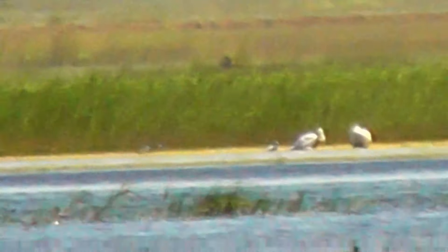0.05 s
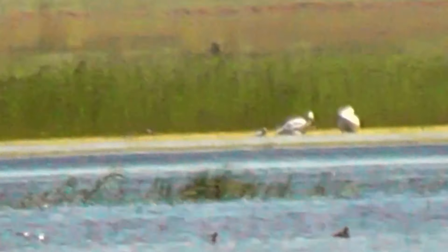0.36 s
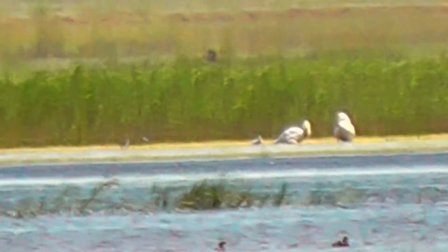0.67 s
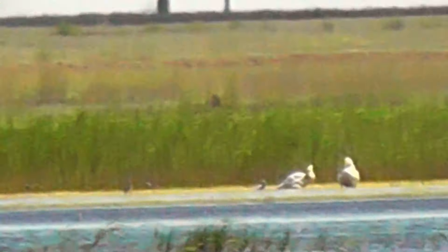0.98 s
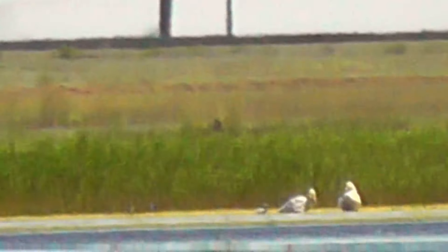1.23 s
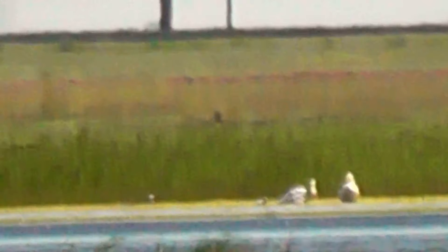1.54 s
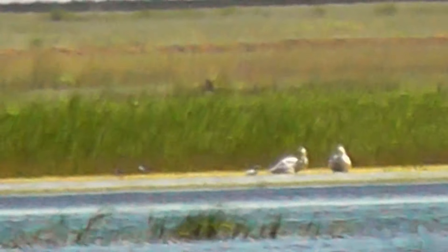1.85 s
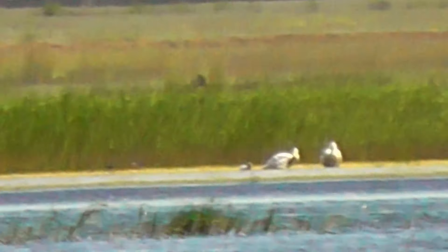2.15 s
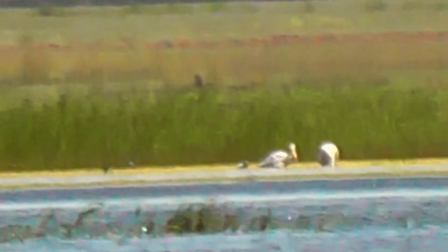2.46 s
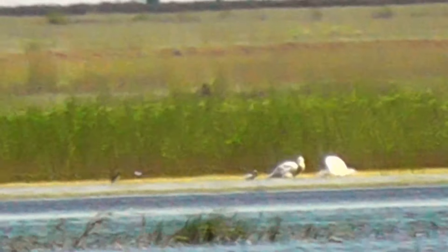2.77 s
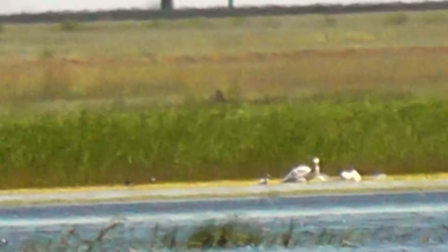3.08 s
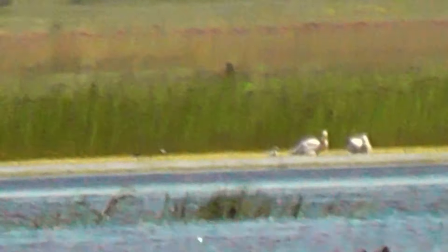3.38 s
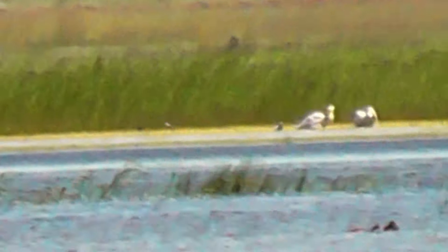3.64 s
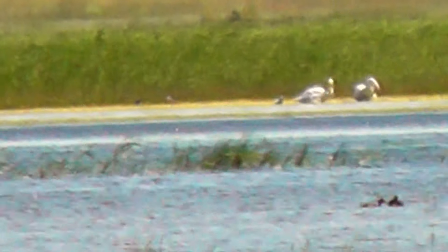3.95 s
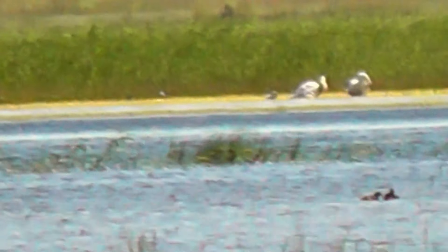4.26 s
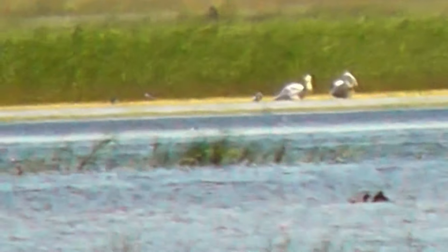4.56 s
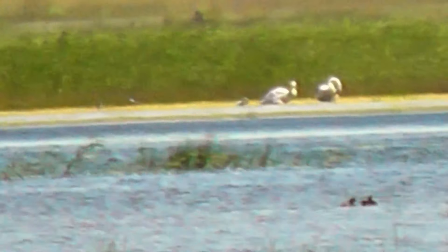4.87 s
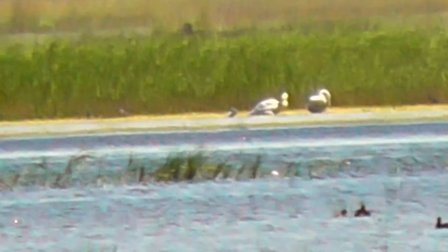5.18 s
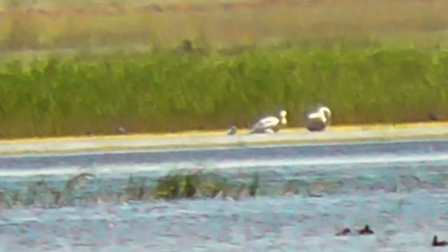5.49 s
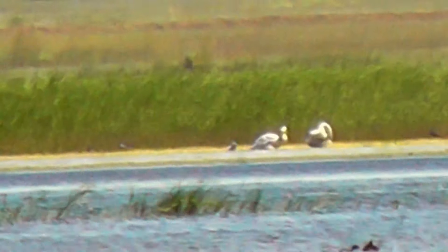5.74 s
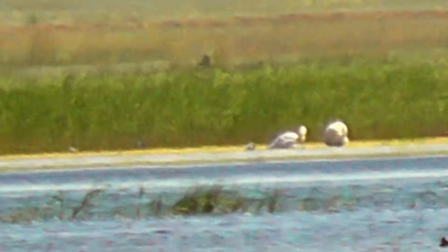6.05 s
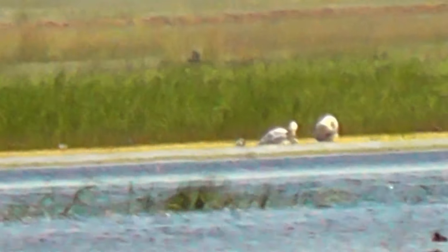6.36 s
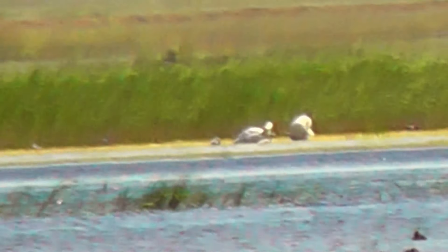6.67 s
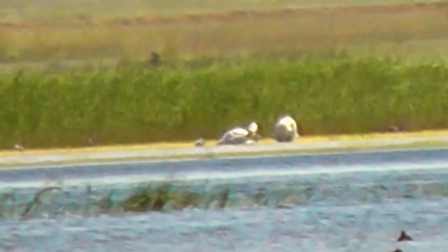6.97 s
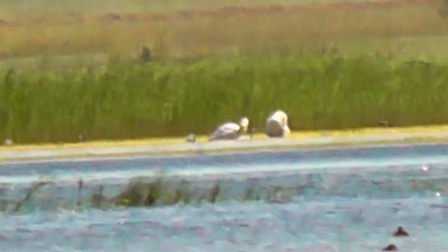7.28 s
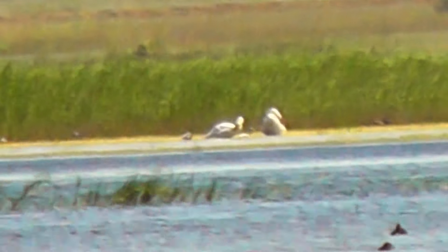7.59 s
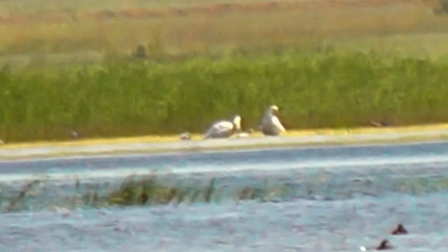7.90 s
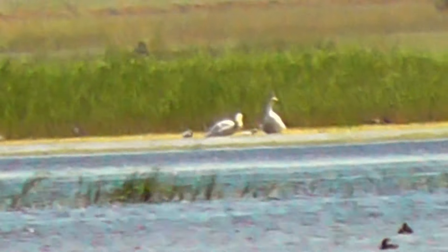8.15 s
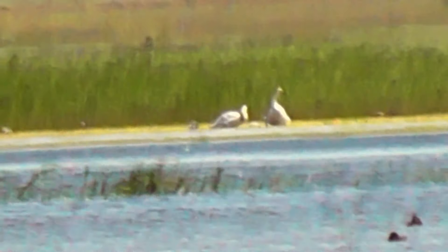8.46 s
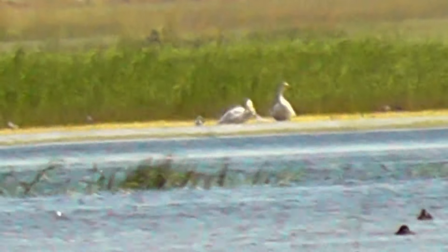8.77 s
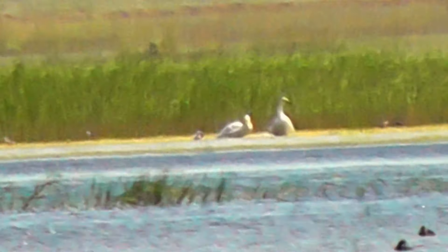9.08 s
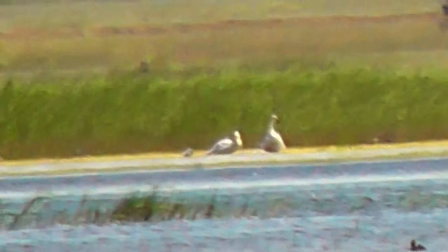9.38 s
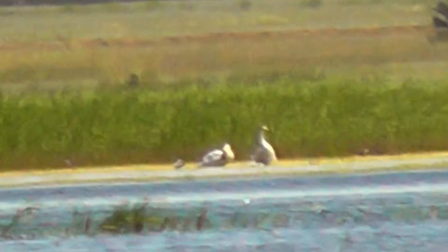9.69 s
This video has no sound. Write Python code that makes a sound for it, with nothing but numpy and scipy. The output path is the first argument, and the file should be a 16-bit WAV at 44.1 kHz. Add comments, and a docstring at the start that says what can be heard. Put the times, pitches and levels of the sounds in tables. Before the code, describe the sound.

Short nasal waterbird calls repeat steadily, then turn quieter, while wind buffets the microphone and water and reeds hiss faintly.

```python
"""A waterbird repeats short, rising, nasal calls on a lake shore. Its voice box makes the tone, and its
throat and bill shape it. Each call has one close reflection and a faint trail from the open land.
One call breaks off abruptly, and the later ones are softer. Wind rumbles on the microphone, a hand
brushes and knocks the camera, far birds whistle, and water and reeds hiss."""
import sys
import numpy as np
from scipy import signal
from scipy.fft import rfft, irfft, next_fast_len
from scipy.io import wavfile

SR = 44100
rng = np.random.default_rng(int(sys.argv[2]) if len(sys.argv) > 2 else 0)


def generate_wav(signal):
    """Clip the signal to [-1, 1] and save it as 16-bit WAV at the path in sys.argv[1]."""
    frames = np.transpose(np.atleast_2d(signal))
    scaled = np.clip(frames, -1, 1) * 32767
    pcm = np.round(scaled).astype(np.int16)
    wavfile.write(sys.argv[1], SR, pcm)


N = 433503
TIME = np.arange(N) / SR
SIDES = np.array([[.5], [-.5]])  # left, right
# Where the bird sits between the ears. Each row: time in seconds, left minus right in dB.
BIRD_LEAN = [(0, -4.5), (1.4, -4), (2.3, -3.5), (3.6, -1.2), (6.02, -1.2), (6.22, -6.5), (7.9, -4),
             (9.7, -5.5)]


def waterbird(break_s=6.0368, resume_s=6.2, trail_db=-2, catch_lead_s=0.0049, catch_db=9):
    """Two runs of calls; the first stops dead in the middle of a call, trail and all."""
    # Each row: start in seconds, length in seconds, halfway pitch in Hz, relative level in dB, boost of
    # the third harmonic in dB, swell in dB, roughness from 0 to 1, reflection delay in milliseconds.
    calls = [(0.061, .06, 1009, -36, -0.5, -0.5, 0.58, 2.24),
             (.37, 0.056, 1045, -33, -0.5, 7.5, 0.64, 2.57),
             (0.794, 0.056, 1061, -30.5, 1, 7.5, 0.46, 5.55),
             (1.205, 0.059, 1046, -30, 1.5, 0.5, 0.65, 3.66), (1.649, 0.062, 1049, -31, 1.5, 4, 0.64, 2.6),
             (2.038, .057, 1005, -29, 3, 1.5, 0.42, 4.26), (2.319, 0.067, 954.6, -30.5, 1.7, -1, 0.45, 3.8),
             (2.947, .055, 955, -32, 3.5, 3.5, 0.5, 4.5), (3.244, 0.069, 955, -33, -0.5, 4, 0.6, 8.7),
             (3.547, 0.068, 938.4, -33, -1, 5, 0.34, 8.63), (3.83, 0.069, 932, -33, 2.5, 3.5, 0.59, 3.85),
             (4.193, 0.057, 965.3, -30, -1.3, 0, .43, 4), (4.576, 0.064, 972, -32.5, 1.5, 4.5, 0.55, 6.6),
             (4.879, 0.066, 991.6, -31, -1.5, 1, 0.58, 6.2),
             (5.225, 0.061, 987.3, -30, -2.5, 3, 0.68, 6.67),
             (5.581, 0.065, 972, -29.5, -1.5, -4, 0.57, 4.1),
             (6.013, 0.036, 965.3, -31.5, -0.5, 8, 0.54, 2.7), (6.227, 0.063, 921, -41, 0, 6, 0.56, 13.63),
             (6.653, .063, 944, -44.5, 2.5, 5, 0.37, 5.31), (6.97, 0.059, 911, -41, 2.7, 5, 0.24, 3.4),
             (7.251, 0.059, 919, -41.5, -0.8, 7.5, .33, 4.7), (7.517, 0.06, 916, -39, 5, 0.5, 0.17, 1.35),
             (7.791, 0.064, 911, -43.5, -0.8, -2.5, 0.46, 3.1),
             (8.149, 0.056, 931, -45, 8.5, 4.5, 0.26, 2.01), (8.556, 0.051, 950, -43, 1.5, 7, 0.37, 4.26),
             (8.894, 0.059, 922, -42.5, 0.5, 7.5, 0.2, 3.4), (9.214, .058, 938, -42.5, 3, 5, 0.25, 1.86),
             (9.604, .057, 941, -45.5, 3.5, 12, 0.35, 4.4)]
    first, second = np.zeros((2, 2, N))
    for row in calls:
        start_s = row[0]
        run = first if start_s < resume_s else second
        add(run, start_s - catch_lead_s, gain_of(catch_db) * catch(row))
        add(run, start_s, call(row))
    first += gain_of(trail_db) * swaying(shore(first))
    second += gain_of(trail_db) * swaying(shore(second))
    return first * (TIME < break_s) + second


def call(row, scoop=0.1002, scoop_s=.004, bend=0.13, attack_s=0.017, release_s=0.012,
         jitter=0.049, shimmer=0.6, rasp_db=-23, full_force_db=-27):
    """The voice box locks on a rising pitch, then frays; its delayed reflection beats against it."""
    # Resonances of the throat and bill. Each row: frequency in Hz, gain in dB.
    throat = [(900, -19), (1080, -18), (1820, -3.5), (1960, -3.3), (2120, 1), (2750, 0.5), (3200, -0.06),
              (3700, -6), (3950, -7), (4200, -10), (4600, -14), (4850, -14), (5200, -19)]
    # Harmonics above the fifth. Each row: frequency in Hz, dB relative to the fifth at full force.
    overtones = [(5600, -15), (6200, -22), (6900, -15.5), (7600, -16.5), (8600, -21), (9600, -26),
                 (11500, -33), (15000, -40)]
    # Extra lean between the ears. Each row: frequency in Hz, left minus right in dB.
    extra_lean = [(1000, -4.2), (2000, -1.2), (3000, 0), (4000, -.8), (5000, -3.2), (6000, 3), (9000, 3)]
    # Phase between the two microphone openings. Each row: frequency in Hz, left's lead in radians.
    left_lead = [(950, .7), (1900, .05), (2900, -.2), (4100, -.25), (5200, 0), (6000, .7), (8700, .6),
                 (10500, 1.8)]
    # Tone of the rasp in the voice. Each row: frequency in Hz, relative level in dB.
    rasp_colour = [(500, -35.5), (1000, 21.5), (2000, 6.5), (3000, -14), (4500, -23), (6000, 8),
                   (7500, -3.5), (10000, -30.5), (15000, -42.5)]
    start_s, length, pitch_hz, level_db, ring_db, swell_db, rough, delay_ms = row
    push_db = level_db - full_force_db
    force = min(gain_of(push_db), 1) ** 0.43  # soft calls are duller
    rise_hz = 110.2 + 1.85 * push_db  # loud calls glide further up
    lean_db = along(BIRD_LEAN, start_s)
    t = np.arange(int((length + delay_ms / 1000) * SR) + 2) / SR
    progress = np.minimum(t / length, 1)
    fray = rough * (0.23 + 0.77 * np.sin(np.pi / 2 * progress) ** 4)  # nearly clean at first
    glide_hz = rise_hz * (progress - .5) * (1 - bend * (progress - .5))
    hz = pitch_hz * (1 - scoop * np.exp(-t / scoop_s)) + glide_hz
    opening = np.minimum(t / attack_s, 1)
    closing = np.clip((length - t) / release_s, 0, 1)
    cycles = np.cumsum(hz * (1 + jitter * fray * closing * wander(1500, len(t)))) / SR
    effort = (np.sin(np.pi / 2 * opening) * np.sin(np.pi / 2 * closing)) ** 2
    effort *= abs(np.sin(np.pi * progress)) ** 0.18 * gain_of(swell_db * (progress + 1))
    earlier = t - delay_ms / 1000
    bounce = 0.51 * np.exp(-delay_ms / 20)  # the reflection weakens as its path grows
    echo_cycles = np.interp(earlier, t, cycles)
    echo_effort = bounce * np.interp(earlier, t, effort, left=0)
    out = np.zeros((2, len(t)))
    for k in range(1, 16):
        # soft calls keep more of their lowest harmonic
        boost_db = ring_db * (k == 3) - .25 * push_db * (k == 1)
        level = gain_of(level_db + read(throat, min(k, 5) * pitch_hz) + boost_db)
        flutter = shimmer * fray
        end_hz = k * hz[-1]
        if k > 5:
            flutter += 0.32  # the faint overtones are hoarse throughout
            level *= force * gain_of(read(overtones, end_hz))
        harmonic = effort * np.exp(2j * np.pi * k * cycles)
        harmonic += echo_effort * np.exp(2j * np.pi * k * echo_cycles)
        harmonic *= 1 + flutter * wander(180, len(t))
        harmonic *= gain_of(-1.2 * (k - 3) * progress)  # upper harmonics peak sooner
        stereo = ears(lean_db + read(extra_lean, end_hz)) * np.exp(1j * SIDES * read(left_lead, end_hz))
        out += level * (harmonic * stereo).real / harmonic.real.std()
    rasp = noise(rasp_colour, len(t)) * np.sqrt(effort) * (fray + 0.094)
    return out + gain_of(level_db + rasp_db) * rasp * ears(lean_db)


def catch(row, length_s=0.015, start_ratio=0.775, end_ratio=0.846, jitter=0.035):
    """A short, hoarse creak at a lower pitch swells and then breaks into the call."""
    # Tone of the creak. Each row: frequency in Hz, relative level in dB.
    colour = [(750, -30.5), (1500, -26), (2500, -15.5), (3400, -19.5), (4200, -28.5), (5200, -25)]
    start_s, _, pitch_hz, level_db, *_ = row
    progress = np.linspace(0, 1, int(length_s * SR))
    hz = pitch_hz * (start_ratio + (end_ratio - start_ratio) * progress)
    hz *= 1 + jitter * wander(600, len(progress))
    cycles = np.cumsum(hz) / SR
    # the higher a harmonic, the later it grows
    creak = sum(gain_of(read(colour, k * hz)) * progress ** (k / 2 - .5) * np.cos(2 * np.pi * k * cycles)
                for k in range(1, 7))
    return creak * np.sin(np.pi * progress ** 2) * gain_of(level_db) * ears(along(BIRD_LEAN, start_s))


def shore(sound, near_db=-18, near_decay_s=0.021, far_db=-23, gap_s=0.0097, likeness=0.99):
    """Sound scatters off the nearby ground, then trails away among reeds and banks."""
    # How long the trail lasts. Each row: frequency in Hz, seconds to fade by 60 dB.
    fade_times = [(1000, 0.22), (2000, 0.67), (3000, 0.5), (4000, .42), (5000, 0.53), (9000, 0.29)]
    t = np.arange(SR) / SR
    echoes = rng.standard_normal((3, SR)) * (rng.random((3, SR)) < .08) * (t > gap_s)
    echoes = np.sqrt(likeness) * echoes[:1] + np.sqrt(1 - likeness) * echoes[1:]  # shared + each ear's
    hz, frame_s, bands = signal.stft(echoes, SR, nperseg=256)
    bands = bands * 1e-3 ** (frame_s / read(fade_times, hz)[:, None])
    far = signal.istft(bands, SR, nperseg=256)[1][:, :SR]
    near = echoes * np.exp(-t / near_decay_s)
    response = gain_of(near_db) * near / np.linalg.norm(near[0])
    response += gain_of(far_db) * far / np.linalg.norm(far[0])
    return signal.fftconvolve(sound, response, axes=1)[:, :N]


def swaying(trail, depth_radians=0.6, rate_hz=70):
    """Moving reeds and air shift the echo paths and blur the tones of the trail."""
    phase_shift = np.exp(1j * depth_radians * wander(rate_hz, N))
    return (signal.hilbert(trail, next_fast_len(N))[:, :N] * phase_shift).real


def wind(buffet_boost_db=2, surge_boost_db=1.5, surge_growth=2.1, calm_db=-61):
    """Gusts swell and die over a breeze on the microphone, as quick buffets and deep surges."""
    # The breeze. Each row: time in seconds, relative level in dB.
    breeze = [(0, -58.5), (.7, -55), (1.3, -61), (2.5, -61.5), (3.3, -60.5), (3.9, -55), (4.5, -61.5),
              (5.05, -57), (5.7, -56.5), (6.2, -65.5), (7.3, -64.5), (8.3, -55), (8.85, -59), (9.3, -53),
              (9.8, -61.5)]
    # Each row: time of the peak in seconds, length in seconds, relative buffet and surge levels in dB.
    gusts = [(.13, 0.078, -51, -54), (0.401, 0.098, -43, -63), (0.634, 0.079, -44.5, -50),
             (0.824, 0.14, -48, -59), (1.15, 0.063, -59, -64), (1.478, 0.089, -58.5, -72),
             (2.021, .1, -53, -56), (2.848, 0.04, -53.5, -63), (3.58, .08, -54.5, -52),
             (3.725, .06, -38.5, -52), (3.868, 0.093, -46.5, -55), (4.128, 0.075, -46, -48),
             (4.875, .14, -46, -54), (5.124, 0.14, -55.5, -48), (5.5, 0.064, -47.5, -64),
             (5.718, 0.094, -53, -54), (6.67, .08, -50.5, -68), (7.6, 0.095, -58, -59),
             (7.9, 0.065, -50, -59), (8.088, 0.083, -46.5, -51), (8.405, .14, -49, -48),
             (8.547, 0.072, -56, -42.5), (8.86, 0.14, -72, -53), (9.135, 0.058, -46.5, -56),
             (9.43, 0.078, -50, -46)]
    # Tone of the buffets and of the large, deep swirls. Each row: frequency in Hz, relative level in dB.
    buffet_colour = [(25, -25.5), (45, -14), (65, 0), (95, 0.5), (140, -11.5), (220, -15), (400, -47),
                     (900, -46.5), (3000, -83)]
    surge_colour = [(12, -18), (28, -6), (42, 3), (56, 5), (75, -14), (150, -39), (1000, -86.5)]
    breeze_db = along(breeze, TIME)
    buffet_power = gain_of(breeze_db) ** 2
    # surges are weak in a lull but grow faster than the breeze
    surge_power = gain_of(-70.5 + surge_growth * (breeze_db - calm_db)) ** 2
    for peak_s, length, buffet_db, surge_db in gusts:
        swell = np.exp(-2 * np.pi * ((TIME - peak_s) / length) ** 2)
        buffet_power += gain_of(buffet_db) ** 2 * swell
        surge_power += gain_of(surge_db) ** 2 * swell
    buffets = eddies(buffet_colour, 10 * np.log10(buffet_power) + buffet_boost_db)
    surges = eddies(surge_colour, 10 * np.log10(surge_power) + surge_boost_db)
    return buffets + surges


def eddies(colour, level_db, lump_db=2):
    """Lumpy swirls of air strike each microphone opening separately."""
    swirls = [evened(noise(colour, N) * gain_of(lump_db * wander(15, N))) for _ in range(2)]
    return np.array(swirls) * gain_of(level_db)


def handling(grain_db=3, lean_db=-2):
    """Skin brushes grainily over the camera's casing, which also gives a few dry ticks."""
    # Each row: start in seconds, length in seconds, relative level in dB.
    brushes = [(6.061, 0.11, -57), (6.338, 0.11, -55.5), (6.481, 0.11, -55.5), (9.721, 0.12, -63.5)]
    # Each row: start in seconds, relative level in dB, decay time in seconds.
    knocks = [(6.126, -53, .001), (6.322, -46, .001), (6.6363, -48, 0.001), (6.6559, -37.5, 0.0039),
              (6.662, -43, 0.0032)]
    # Tone of a brush and of a knock. Each row: frequency in Hz, relative level in dB.
    brush_colour = [(300, -16), (900, -6), (1600, 4), (2500, -3.5), (3400, 0), (4200, -13.5), (7000, -21.5),
                    (15000, -42)]
    knock_colour = [(100, -7), (400, 10.5), (800, -1), (1250, -1), (1650, 10.5), (2600, -8), (4000, 6),
                    (6000, -12), (12000, -41), (15000, -48)]
    out = np.zeros((2, N))
    for start_s, length, db in brushes:
        size = int(length * SR)
        stroke = np.hanning(size) * evened(gain_of(grain_db * wander(320, size)))
        add(out, start_s, gain_of(db) * stroke * noise(brush_colour, size))
    t = np.arange(2048) / SR
    for start_s, db, decay_s in knocks:
        add(out, start_s, gain_of(db) * np.exp(-t / decay_s) * noise(knock_colour, len(t)))
    return out * ears(lean_db)


def far_birds(arch_hz=70, trail_db=3):
    """Thin, arched whistles carry across the water."""
    # Each row: start in seconds, length in seconds, first pitch in Hz, last pitch in Hz, peak in dB.
    whistles = [(1.784, 0.058, 2880, 2570, -59), (4.29, 0.085, 1300, 1400, -67),
                (4.408, 0.096, 1470, 1370, -69), (7.723, 0.067, 2875, 2760, -54)]
    out = np.zeros((2, N))
    for start_s, length, start_hz, end_hz, db in whistles:
        progress = np.linspace(0, 1, int(length * SR))
        arch = np.sin(np.pi * progress)
        hz = start_hz + (end_hz - start_hz) * progress + arch_hz * arch
        add(out, start_s, gain_of(db) * arch * np.sin(2 * np.pi * np.cumsum(hz) / SR))
    return out + gain_of(trail_db) * shore(out)


def air(hush_db=-55, swell_db=1.25, hum_waver=0.51, hum_drift_hz=2.364):
    """A wide hush of water and reeds, a thin sizzle in the reeds and two faint, wavering tones."""
    # Tone of the hush and of the sizzle. Each row: frequency in Hz, relative level in dB.
    hush_colour = [(20, -20.5), (60, 2.5), (130, 4.5), (250, -2), (450, -6.5), (800, -11), (1300, -18.5),
                   (1900, -19), (2400, -24), (3000, -20.5), (5000, -30), (7200, -35), (10000, -35),
                   (15000, -40)]
    sizzle_colour = [(4000, -53.5), (6000, -6), (6900, 3.5), (7600, 3), (8800, -7.5), (12000, -29.5)]
    # How alike the hush is in both ears. Each row: frequency in Hz, likeness from 0 to 1.
    likeness = [(50, 0.23), (300, 0.039), (800, 0.12), (2000, 0.82), (5000, 0.77), (12000, 0.076)]
    # Each row: time in seconds, level in dB.
    sizzle_levels = [(0, -78), (6.5, -77.5), (7.4, -78.5), (7.7, -75.5), (8.15, -74), (8.4, -79.5),
                     (9.83, -77)]
    # Each row: pitch in Hz, average level in dB.
    far_tones = [(525, -74.5), (630, -75.5)]
    left, other = rfft(noise(hush_colour, N)), rfft(noise(hush_colour, N))
    same = read(likeness, np.fft.rfftfreq(N, 1 / SR))
    right = same * left + np.sqrt(1 - same ** 2) * other
    hush = irfft(np.array([left, right]), N) * gain_of(hush_db + swell_db * wander(1.9, N))
    sizzle = np.array([noise(sizzle_colour, N) for _ in range(2)]) * gain_of(along(sizzle_levels, TIME))
    hum = np.zeros(N)
    for hz, db in far_tones:
        level = gain_of(db) * (1 + hum_waver * wander(3.3, N))
        hum += level * np.sin(2 * np.pi * np.cumsum(hz + hum_drift_hz * wander(6, N)) / SR)
    return hush + sizzle + hum


def gain_of(db):
    """Turns decibels into a multiplier."""
    return 10 ** (np.asarray(db) / 20)


def evened(sound):
    """Scales a sound to an average strength (rms) of 1."""
    return sound / np.sqrt(np.mean(sound ** 2) + 1e-20)


def read(points, hz):
    """Reads a frequency table, giving each octave equal room."""
    table_hz, values = np.transpose(points)
    return np.interp(np.log(hz + 1), np.log(table_hz + 1), values)


def along(curve, time_s):
    """Reads a curve at the given time."""
    return np.interp(time_s, *np.transpose(curve))


def add(mix, start_s, sound):
    """Mixes a sound in at the given time."""
    part = mix[:, max(round(start_s * SR), 0):][:, :sound.shape[-1]]
    part += sound[..., :part.shape[1]]


def noise(colour, size):
    """Noise of strength 1, shaped by a table of frequencies and levels."""
    gains = gain_of(read(colour, np.fft.rfftfreq(size, 1 / SR)))
    return evened(irfft(rfft(rng.standard_normal(size)) * gains, size))


def wander(rate_hz, size):
    """Smooth random motion of strength near 1, up to about the given rate."""
    span = next_fast_len(size + SR // 4)
    smoothing = np.exp(-(np.fft.rfftfreq(span, 1 / SR) / rate_hz) ** 2)
    return evened(irfft(rfft(rng.standard_normal(span)) * smoothing, span))[:size]


def ears(lean_db):
    """Left and right gains for a level difference."""
    return gain_of(SIDES * lean_db)


def scene():
    """Everything heard on the shore."""
    return waterbird() + far_birds() + handling() + air() + wind()


def record(dry):
    """The camera cuts off the highest treble."""
    low_pass = signal.firwin(511, cutoff=15350, window=("kaiser", 9), fs=SR)
    return signal.oaconvolve(dry, low_pass[None], "same")


dry = scene()
out = record(dry)
generate_wav(out)
```